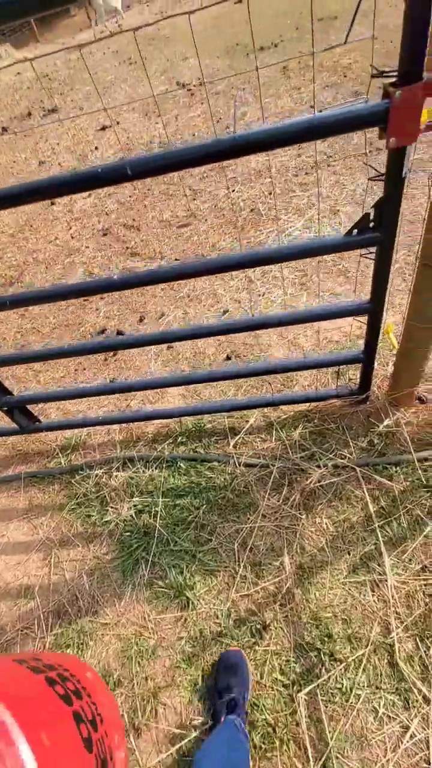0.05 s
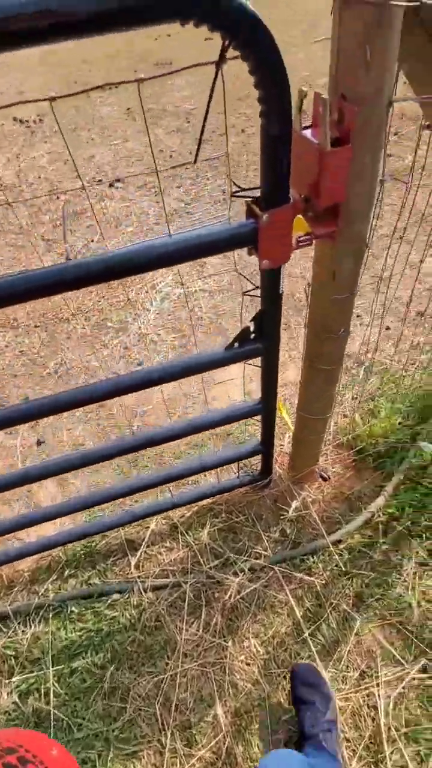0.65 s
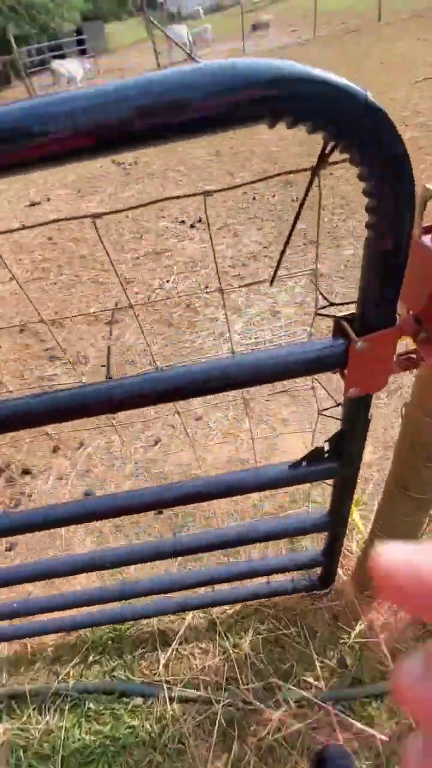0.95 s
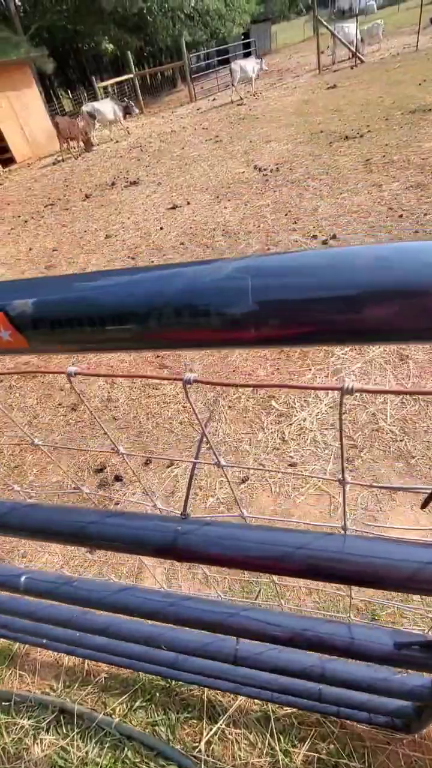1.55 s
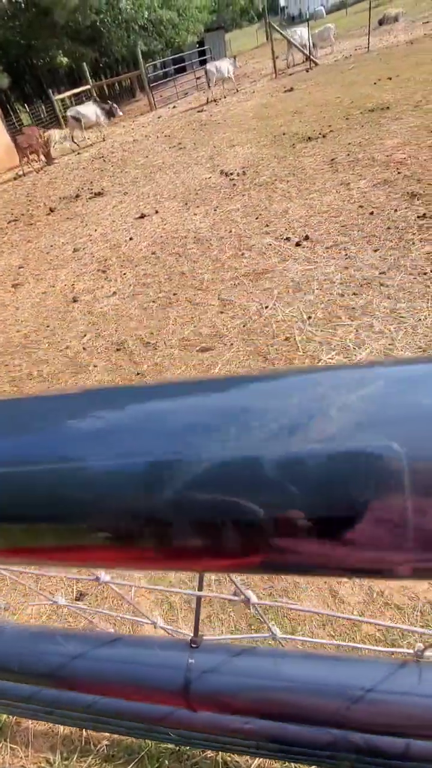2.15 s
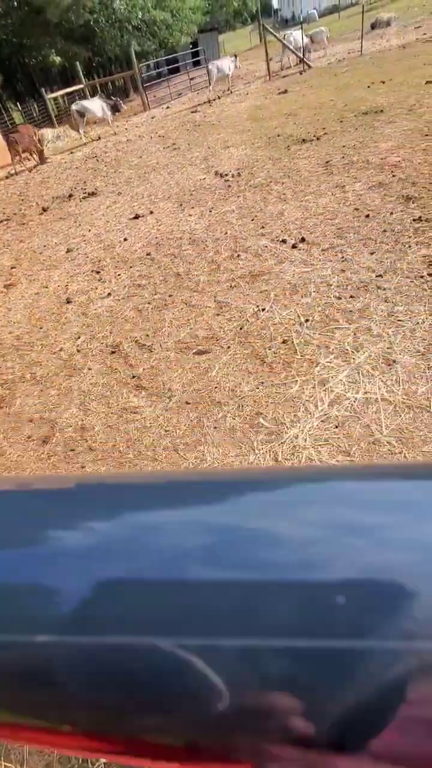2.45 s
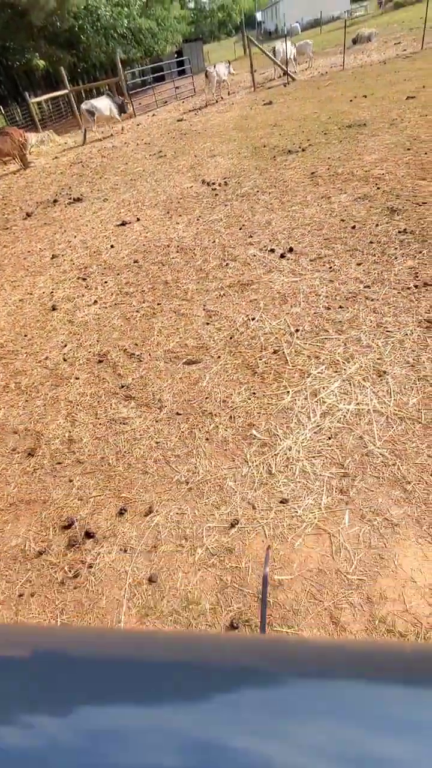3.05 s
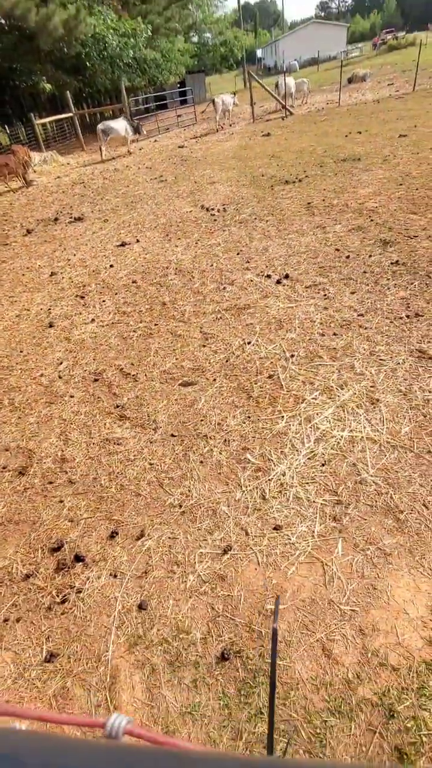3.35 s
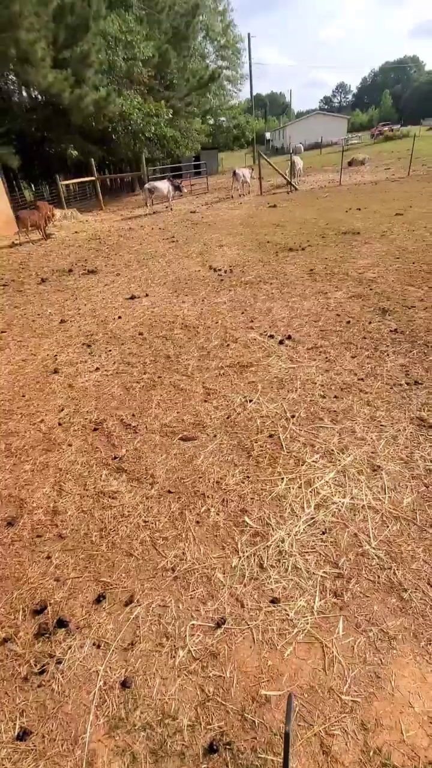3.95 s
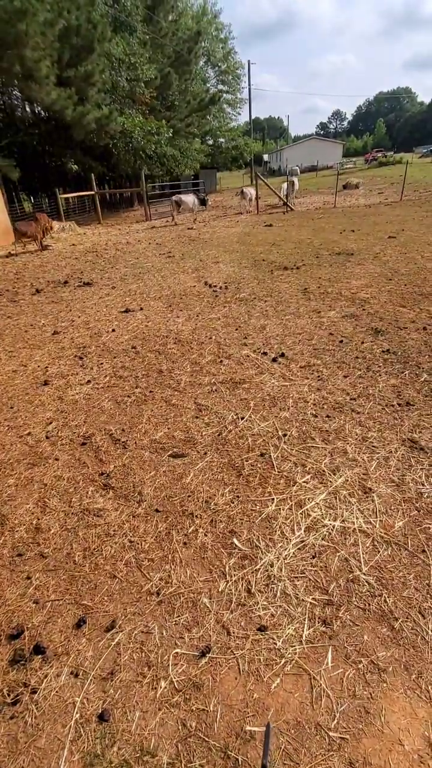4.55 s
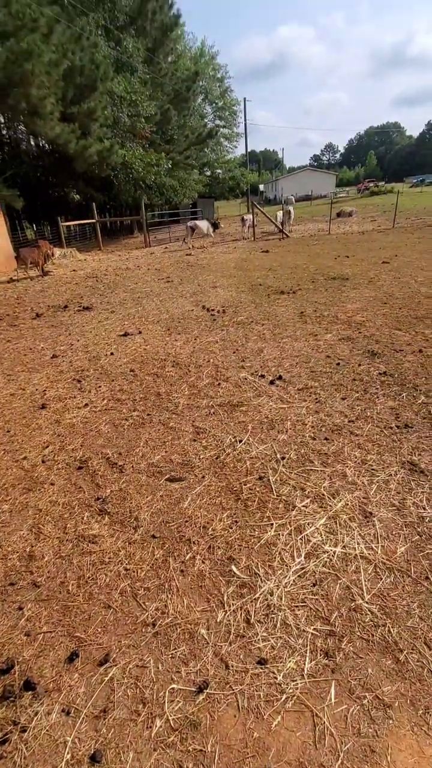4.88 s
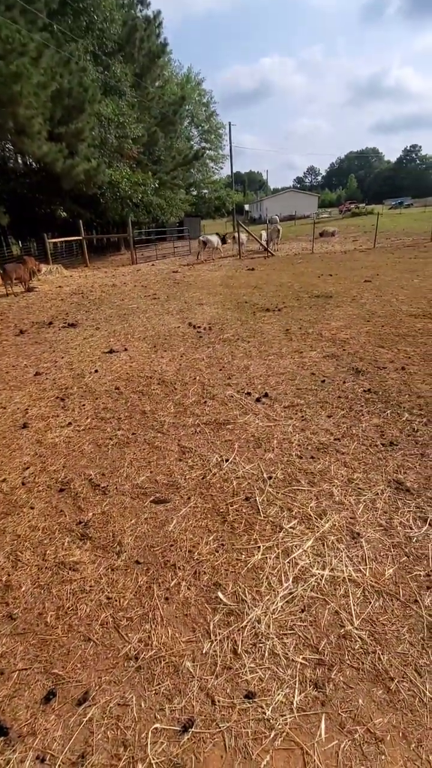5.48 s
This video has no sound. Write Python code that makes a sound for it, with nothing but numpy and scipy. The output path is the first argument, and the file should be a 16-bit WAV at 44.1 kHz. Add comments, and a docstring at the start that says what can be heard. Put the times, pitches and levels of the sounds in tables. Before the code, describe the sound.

For the first second or so, a few steps swish and crackle through dry grass, with dull thuds, soft swells of hiss and a couple of light metal clinks. From about 1.7 seconds a steel chain is handled close by against a tubular farm gate, with a sharp clack at 2.1. The loudest cluster comes around 2.5 to 2.9 seconds: links strike the pipe and ring brightly, setting the gate and its wire mesh shivering. More irregular clacks follow from 3.3 to 4 seconds. Around 4.3 the chain is drawn briefly over the pipe, followed by lighter clinks. A last clatter with soft, dull bumps comes at about 5.3 to 5.5 seconds. Behind it all lie quiet field air and a low wavering hum, with faint thin whistles near 2 and 5 seconds and a distant insect chirping now and then.

```python
"""A steel chain is handled and hooked against a tubular farm gate, close by, outdoors.
First, steps swish through dry grass, with soft, breathy swells of hiss and a few light clinks.
From about two seconds, links clack on the pipe and ring, and hard knocks set the gate and its
wire mesh shivering. After four seconds the chain is drawn over the pipe; a last clatter follows.
Behind it all lie quiet field air and a low hum, with faint whistles and an insect now and then."""
import sys
import numpy as np
from scipy import signal
from scipy.fft import rfft, irfft
from scipy.io import wavfile

SR = 44100
rng = np.random.default_rng(int(sys.argv[2]) if len(sys.argv) > 2 else 0)


def store_wav(level_fs):
    """Save 16-bit WAV to argv[1]."""
    pcm = np.round(np.clip(np.atleast_2d(level_fs), -1, 1) * 32767)
    wavfile.write(sys.argv[1], SR, pcm.T.astype(np.int16))


N = 243431
TIME = np.arange(N) / SR


def from_db(db):
    """Turn decibels into a gain."""
    return 10 ** (np.asarray(db) / 20)


def rms_one(x):
    """Scale a sound to an average power of 1."""
    return x / np.sqrt(np.mean(x ** 2) + 1e-20)


def panned(db):
    """Left and right gains; positive dB leans left."""
    return from_db(np.array([[.5], [-.5]]) * db)


def dying(t, t60):
    """A fade that is 60 dB down after t60 seconds, the fade time."""
    return np.exp(-np.log(1000) * t / max(t60, 1e-3))


def swell(s, length_s, attack_s, t60):
    """Rise, hold, then fade."""
    rise = np.clip((TIME - s) / max(attack_s, 1e-3), 0, 1)
    return rise * dying(np.clip(TIME - s - length_s, 0, 3 * t60), t60)


def in_time(rows):
    """Join (time, value) points into a curve."""
    return np.interp(TIME, *np.transpose(rows))


def at_hz(rows, hz):
    """Read between (frequency, value) points on a log scale."""
    row_hz, values = np.transpose(rows)
    return np.interp(np.log(hz), np.log(row_hz), values)


def add(out, s, sound):
    """Mix a sound in at s seconds."""
    i = max(round(s * SR), 0)
    out[:, i:i + sound.shape[1]] += sound[:, :N - i]


def band(x, low_hz, high_hz, order=2):
    """Keep what lies between two frequencies."""
    return signal.sosfilt(signal.butter(order, [low_hz, high_hz], "band", fs=SR, output="sos"), x)


def resonance(x, hz, width_hz):
    """Ring at one pitch; narrower rings longer."""
    r = np.exp(-np.pi * width_hz / SR)
    feedback = [1, -2 * r * np.cos(2 * np.pi * hz / SR), r * r]
    return signal.lfilter(np.array([1, 0, -1]) * (1 - r * r) / 2, feedback, x)


def noise(spectrum, alike):
    """Coloured stereo noise; alike=1 makes both sides the same."""
    hz = np.maximum(np.fft.rfftfreq(N, 1 / SR), 1)
    mid, side = irfft(rfft(rng.standard_normal((2, N))) * from_db(at_hz(spectrum, hz)), N)
    return rms_one(np.sqrt(1 + alike) * mid + np.sqrt(1 - alike) * side * [[1], [-1]])


def drift(rate):
    """Wander through `rate` random values a second."""
    return np.interp(TIME * rate, np.arange(4096), rng.standard_normal(4096))


def touch(s, db, hz, bite_db, t60, shiver_db):
    """One contact of link and pipe; its very high sparkle grows faster than its treble bite."""
    sparkle_db = max(-12.5 + 2.02 * bite_db, -37)
    return s, db, hz, bite_db, sparkle_db, t60, shiver_db


# Single blows on the pipe. Each row: start in seconds, level in dB, pitch in Hz, bite in dB above
# that level, freedom (0 held by the hand, 1 loose), lead of a lighter touch in seconds.
CLINKS = [(0.656, -35.5, 1086, -25, 0, 0.0023), (1.055, -33, 687, -11.5, 0.7, 0.0071),
          (1.707, -35.5, 1575, -3, 0.26, 0), (1.802, -38.5, 1190, -22, 0.5, 0.00079),
          (1.856, -28, 1544, -12, 0, 0.0026), (1.924, -42.5, 1440, -33, 0.4, 0),
          (1.983, -33, 1540, -12.5, 0.2, 0), (2.0852, -16.5, 1972, -10, 0.34, 0.0076),
          (2.412, -28.5, 1999, -26, 0.32, 0), (2.534, -28, 1974, -31, 0.74, .005),
          (2.5535, -21.5, 2058, -6.5, 0.08, 0.0081), (2.629, -35.5, 1890, -28, 0.6, 0.00066),
          (2.71, -26, 3053, -13, 0.9, 0.0023), (2.752, -29, 2300, -5.5, 0.84, 0.0022),
          (2.7843, -17.5, 1551, 2, 0.82, .008), (2.8544, -16, 2360, 1, 0.74, 0.00035),
          (2.901, -14.5, 1880, -0.5, 0.76, .009), (3.159, -28, 1420, -12, 0.72, 0),
          (3.177, -34.5, 1720, -6, 0.21, 0.00016), (3.3337, -26.5, 2110, -5, 0.62, .0115),
          (3.402, -22, 1990, -4, 0.69, 0.0034), (3.515, -27.5, 1737, -7.5, 0.69, 0.017),
          (3.707, -25, 2455, -4.5, 0.5, 0.0037), (3.7578, -18.5, 1976, -2.5, 0.81, 0.025),
          (3.7668, -20, 1896, -4, 1, 0), (3.975, -16, 2036, -6.5, 0.63, .013),
          (4.017, -27.5, 1969, -5.5, 0.69, 0.001), (4.069, -37.5, 1570, -7.5, 0.2, 0.001),
          (4.217, -45.5, 1812, -20, 0, 0.0024), (4.392, -32, 2660, -5.5, 0.68, 0),
          (4.515, -31.5, 3253, -7, 1, 0.0055), (4.609, -30.5, 2933, -7, 1, 0.0009),
          (5.111, -40.5, 634.4, -14, .3, 0.0012), (5.287, -34.5, 1580, -9, 0.01, 0.00035),
          (5.3495, -18, 2530, -4.5, 0.84, 0.0045), (5.422, -32.5, 3034, -11.5, 0.63, 0.00034),
          (5.488, -29, 3100, -11.5, 0.6, 0)]
DAMPED_T60_S, LOOSE_T60_S = 0.026, 0.081
DAMPED_SHIVER_DB, LOOSE_SHIVER_DB = -49, -3.5   # how much of a blow passes into the gate


def clinks(lead_db=-6.5, bounce_db=-18.5, bounce_s=.036):
    """A looser link clacks longer, shakes the gate more and bounces."""
    touches = []
    chance = rng.uniform(.8, 1.2, (len(CLINKS), 2))
    for (s, db, hz, bite_db, freedom, lead_s), (late, detune) in zip(CLINKS, chance):
        t60 = DAMPED_T60_S * (LOOSE_T60_S / DAMPED_T60_S) ** freedom
        shiver_db = db + DAMPED_SHIVER_DB + freedom * (LOOSE_SHIVER_DB - DAMPED_SHIVER_DB)
        touches.append(touch(s, db, hz, bite_db, t60, shiver_db))
        if lead_s > .003:   # a lighter touch comes first
            touches.append(touch(s - lead_s, db + lead_db, hz * detune,
                                 bite_db - 3, t60, shiver_db + lead_db))
        if freedom > .62:   # a loose link falls back once
            touches.append(touch(s + bounce_s * late, db + bounce_db, hz * detune,
                                 bite_db - 4, t60, shiver_db + bounce_db))
    return touches


# Pulls of the chain over the pipe. Each row: start and length in seconds, level in dB,
# pitch in Hz, bite in dB above that level, gate shiver in dB.
DRAGS = [(2.388, .065, -34.5, 1774, -14, -46.5), (2.457, .04, -32, 1911, -25, -45.5),
         (3.019, .04, -42, 1706, -6, -44.5), (3.441, .04, -41, 1937, -6.5, -46),
         (4.258, .2, -35, 1657, -8.5, -35), (4.775, .04, -37, 2360, -7, -42.5)]
LINK_GAP_S, DRAG_T60_S = .023, 0.088


def drags(jitter_s=.003, spread_db=2.5, spread_octaves=0.228):
    """Links trip over the pipe at a nearly even pace, each with its own strength and pitch."""
    touches = []
    for s, length_s, db, hz, bite_db, shiver_db in DRAGS:
        count = int(np.ceil(length_s / LINK_GAP_S))
        for k, (late, size, detune) in enumerate(rng.standard_normal((16, 3))[:count]):
            start = s + k * LINK_GAP_S + jitter_s * late
            pitch = hz * 2 ** (spread_octaves * detune)
            extra_db = spread_db * size
            touches.append(touch(start, db + extra_db, pitch, bite_db, DRAG_T60_S, shiver_db + extra_db))
    return touches


# The lightest contacts. Each row: start in seconds, level in dB, pitch in Hz, bite in dB above it.
TICKS = [(0.509, -44, 1260, -0.5), (.991, -53.5, 1970, 2), (1.018, -59, 2020, -2), (1.489, -56.5, 2100, 5),
         (1.758, -44.5, 1560, 5.5), (3.926, -39, 1569, -1.5), (5.009, -52, 1376, 8.5)]


def ticks(t60=0.01):
    """A link's tip just grazes the pipe with a tiny, dry tick."""
    return [touch(s, db, hz, bite_db, t60, db + DAMPED_SHIVER_DB) for s, db, hz, bite_db in TICKS]


# Short resonances of the pipe. Each row: pitch in Hz, width in Hz, boost in dB.
PIPE_MODES = [(604, 18, 8), (788, 17, 5.5), (1170, 420, 9.5), (1546, 31, 9), (1930, 120, 1.5),
              (2121.7, 96, 9.5), (2437, 59.7, 6), (2673, 186, 11.5), (3090, 60, 13), (4081, 23, 7.5),
              (3550, 61, 5.5), (4135, 130, 9), (4716, 44, 9.5), (5164, 20, 6), (5850, 110, 9.5),
              (7040, 39, 11), (7520, 150, 5.5), (8210, 130, 5.5)]


def clacks(touches, contact_s=0.003, grain_db=1.5, ping_db=-5, alike=0.49, lag_s=0.000394):
    """At each touch a link chatters on the pipe, which colours the burst; the hand soon damps it."""
    out, t = np.zeros((2, N)), np.arange(SR // 6) / SR
    for s, db, hz, bite_db, sparkle_db, t60, _ in touches:
        left, other, chance = rng.standard_normal((3, len(t)))
        grain = chance[np.arange(len(t)) // 30]   # a new value every 30 samples
        # part of the burst reaches both sides, the right a little later
        right = alike * np.interp(t - lag_s, t, left) + np.sqrt(1 - alike ** 2) * other
        envelope = (1 - np.exp(-t / 0.00022)) * dying(np.maximum(t - contact_s, 0), t60)
        burst = np.array([left, right]) * from_db(grain_db * grain) * envelope
        for mode_hz, width_hz, lift_db in PIPE_MODES:
            burst = burst + (from_db(lift_db) - 1) * resonance(burst, mode_hz, width_hz)
        body = band(burst + 1.9 * resonance(burst, hz, width_hz=220), 1155, 2310)
        # the pipe wall answers with one brief, clean ping
        ping = np.sin(2 * np.pi * hz * t + grain[:2, None])
        ping *= (1 - np.exp(-t / 0.00044)) * dying(t, t60=0.03)
        body = rms_one(body) + from_db(ping_db) * rms_one(ping)
        # softer contacts lose the top of their bite
        bite = band(burst, 3290, np.interp(sparkle_db, [-42, -15], [6000, 8600]), order=5)
        sparkle = band(burst, 9300, 14150, order=3)
        thud = band(burst, 482, 893)
        thud_db = -13 + 4 * np.log2(t60 / DRAG_T60_S)   # longer clacks carry more thud
        parts = (thud, thud_db, -2), (body, 0, -1), (bite, bite_db, 0), (sparkle, sparkle_db, -6)
        for part, part_db, pan_db in parts:
            attack = np.sqrt(np.mean(part[:, :SR // 125] ** 2, axis=1, keepdims=True))   # first 8 ms
            add(out, s, part / attack * from_db(db + part_db) * panned(pan_db))
    return out


# A link's own tones. Each row: pitch in Hz, relative level in dB, fade time in seconds.
LINK_TONES = [(1547, -6, .3), (3042, -8, .6), (4199, 2, .13), (4640, -4, .2), (5160, -16, .12),
              (5390, -7, .14), (5560, -16, .3), (5796, -5, .26), (6883, 3, .11), (7150, -6, .12),
              (7430, -6, .12), (7715, -5, .08), (8358, 5, .075), (10270, -16, .12), (11050, -12, .14),
              (12660, -15, .1), (13991, -16, .17)]
# Links hanging free after a blow. Each row: start in seconds, favoured pitch in Hz,
# its level in dB, dB added to the other tones.
RINGS = [(1.926, 1547, -46, -81), (1.982, 1547, -41, -79), (2.086, 7150, -48, -67), (2.438, 1547, -35, -71),
         (2.553, 7150, -39, -54), (2.716, 5796, -28, -63), (2.785, 3042, -20, -17), (2.857, 5796, -19, -19),
         (2.9, 5560, -30, -44), (3.332, 7150, -35, -74), (3.404, 4199, -55, -52), (3.708, 7150, -21.5, -53),
         (3.771, 4640, -23.5, -45), (3.975, 5160, -26, -38), (4.068, 1547, -40, -76)]


def ringing_links(free_s=0.071, choke_t60=0.033, rise_s=0.00087):
    """A free link rings in all its tones; the contact point favours one of them."""
    out, t = np.zeros((2, N)), np.arange(SR // 4) / SR
    hz, tone_db, t60 = np.transpose(LINK_TONES)
    fades = [dying(t, life) for life in t60]
    tones = np.exp(2j * np.pi * hz[:, None] * t) * fades * (1 - np.exp(-t / rise_s))
    for s, favoured_hz, db, others_db in RINGS:
        levels = others_db + tone_db
        levels[np.argmin(np.abs(hz - favoured_hz))] = db
        # left and right are up to half a cycle apart
        cycle, apart = rng.random((2, len(hz)))
        phases = 2 * np.pi * cycle + np.pi * (apart - .5) * [[1], [-1]]
        ring = ((from_db(levels) * np.exp(1j * phases)) @ tones).real
        # the hand chokes the ring, unless a later clink does so first
        choked_s = min([s + free_s] + [later for later, *_ in CLINKS if later > s + LINK_GAP_S])
        add(out, s, ring * dying(np.maximum(s + t - choked_s, 0), choke_t60))
    return out


# The shiver of pipes and mesh. Each row: frequency in Hz, relative level in dB.
SHIVER_COLOUR = [(250, -11), (450, -12), (700, -9), (950, -8), (1350, -0.5), (1900, 1.5), (2600, 0.5),
                 (3400, 0.5), (4300, -7), (6000, -23), (8000, -16), (9200, -34)]
# How long it lasts. Each row: frequency in Hz, fade time in seconds.
SHIVER_FADE = [(300, 0.55), (1800, 0.36), (4000, 0.29), (8000, 0.32)]
# Long tones of the frame. Each row: pitch in Hz, relative level in dB, fade time in seconds.
FRAME_TONES = [(1338, -26, 5.0), (1362, -26, 4.5), (1530, -18, .9), (1626, -19, .9), (1775, -24, 2.2),
               (1852, -9, .3), (1950, -15, .9), (2225, -11, .42), (2579, -20, 1.0), (2799, -18, .7),
               (3138, -20, .6), (3795, -12, 1.1), (3860, -21, .8)]


def gate(touches, frame_db=-3, uneven_db=3, count=420):
    """Knocks spread through pipes and mesh: hundreds of crowded tones and a few long ones."""
    t = np.arange(3 * SR) / SR
    early = t[:SR // 2]
    mesh = np.zeros((2, len(t)))
    pitches = 250 + 9000 * (np.arange(count) + rng.random(count)) / count
    for hz, phase, size in zip(pitches, rng.random((count, 2, 1)), rng.standard_normal((count, 2, 1))):
        gain = from_db(at_hz(SHIVER_COLOUR, hz) + uneven_db * size)
        tone = np.sin(2 * np.pi * (hz * early + phase))
        mesh[:, :len(early)] += gain * tone * dying(early, at_hz(SHIVER_FADE, hz))
    response = mesh / np.sqrt(np.mean(mesh[:, :SR // 50] ** 2))
    for hz, db, t60 in FRAME_TONES:
        tone = np.sin(2 * np.pi * (hz * t + rng.random((2, 1))))
        response += from_db(db + frame_db) * tone * dying(t, t60)
    knocks = np.zeros((1, N))
    for s, *_, shiver_db in touches:
        add(knocks, s, from_db([[shiver_db]]))
    return signal.fftconvolve(knocks, response * (1 - np.exp(-t / 0.00075)))[:, :N]


# Soft bumps. Each row: start in seconds, peak in dB before panning, pitch in Hz, fade time in seconds.
BUMPS = [(0.338, -40, 136, 0.083), (0.658, -31, 84, 0.026), (0.715, -26, 320, 0.042), (.96, -36, 300, 0.14),
         (2.924, -31, 303.9, 0.32), (4.189, -42.5, 49.5, 0.16), (4.685, -36.5, 204, 0.21),
         (5.291, -33.5, 200, 0.15), (5.351, -34.5, 189.8, 0.14), (5.386, -34.5, 326.3, 0.7),
         (5.456, -35.5, 194, 0.16)]


def bumps(width=0.54, pan_db=-6):
    """Feet and hands make dull, damped thuds on the right."""
    out, t = np.zeros((2, N)), np.arange(SR // 3) / SR
    for s, db, hz, t60 in BUMPS:
        mid, side = rng.standard_normal((2, len(t)))
        push = (mid + 0.9 * side * [[1], [-1]]) * dying(t, t60)
        thud = resonance(resonance(push, hz, width * hz), hz, width * hz)
        add(out, s, thud / np.abs(thud).max() * from_db(db))
    return out * panned(pan_db)


# Steps in dry grass. Each row: start and length in seconds, swish in dB, relative crackle in dB.
STRIDES = [(0.193, 0.084, -53.5, -53), (0.496, 0.034, -60, -55.5), (0.599, 0.068, -41.5, -41),
           (0.706, .22, -37, -41), (0.885, 0.16, -40, -63)]
# The sound of the stalks and of their tips. Each row: frequency in Hz, relative level in dB.
SWISH_COLOUR = [(150, -73), (250, -5.5), (404, -11), (469, -4), (615, -1.5), (1860, -4.5), (3660, -8),
                (4130, -4.5), (9000, -28.5), (11700, -53), (19800, -120)]
CRACKLE_COLOUR = [(4000, -13), (7000, 6), (9000, -4.5), (12000, -4), (16000, -6.5)]


def grass(crackle_db=-5):
    """Dry stalks brush past a shoe and settle: a grainy swish with fine crackle on top."""
    strides = [from_db([[swish], [crackle]]) * swell(s, length_s, attack_s=0.029, t60=0.62)
               for s, length_s, swish, crackle in STRIDES]
    swish, crackle = np.max(strides, axis=0)
    stalks = noise(SWISH_COLOUR, alike=0.013) * swish * from_db(2.6 * drift(250))
    tips = noise(CRACKLE_COLOUR, alike=0.046) * crackle * from_db(crackle_db + 2 * drift(900))
    return stalks + tips


# Swells of hiss. Each row: start and length in seconds, level in dB.
HISS_SWELLS = [(0, 0.063, -48), (0.786, 0.29, -42), (0.989, 0.092, -38.5), (1.161, 0.05, -44.5),
               (1.305, .08, -52)]
# Their hollow resonances. Each row: pitch in Hz, width in Hz, relative level in dB.
HISS_MODES = [(670, 170, -7.5), (1800, 72, -1.5), (2510, 55, 4), (2820, 310, -1), (4220, 350, -5.5)]


def breathy_hiss(grain_db=2.0, hiss_db=-13):
    """Soft, breathy swells of hiss with a few hollow resonances."""
    grainy = rng.standard_normal((2, N)) * from_db(grain_db * drift(200))
    hollow = sum(from_db(db) * (-1) ** k * resonance(grainy, hz, width_hz)
                 for k, (hz, width_hz, db) in enumerate(HISS_MODES))
    hiss = from_db(hiss_db) * rms_one(band(grainy, 4500, 9000, order=1))
    swells = [from_db(db) * swell(s, length_s, attack_s=0.014, t60=0.36)
              for s, length_s, db in HISS_SWELLS]
    return (rms_one(hollow) + hiss) * np.max(swells, axis=0)


# Whistles. Each row: start and length in seconds, pitch in Hz, glide in Hz a second, level in dB.
WHISTLES = [(2.012, .07, 2460, -450, -50), (2.158, 0.31, 1800, 500, -53), (2.209, 0.095, 2428, 598, -49),
            (4.8, 0.047, 2642, 25, -51), (4.996, 0.1, 2450, 7, -53.5), (5.135, 0.048, 2640, -200, -46.5)]


def whistles(waver_hz=29):
    """Faint, thin, slightly wavering whistles glide and fade."""
    out, waver = np.zeros(N), waver_hz * drift(170)
    for s, length_s, hz, glide, db in WHISTLES:
        pitch = hz + glide * np.clip(TIME - s, 0, length_s) + waver
        envelope = from_db(db) * swell(s, length_s, attack_s=0.0083, t60=0.24)
        out += envelope * np.sin(2 * np.pi * np.cumsum(pitch) / SR)
    return out


# The sound of the air. Each row: frequency in Hz, relative level in dB.
AIR_COLOUR = [(15, -12), (25, -17), (76, 2.5), (185, -11), (285, -8), (476, -11.5), (607, -7.5), (863, -14),
              (1740, -11.5), (3520, -18), (5880, -19.5), (8590, -29), (16000, -37)]
# Its rise and fall. Each row: time in seconds, level in dB.
AIR_LEVEL = [(0, -51.5), (1.6, -52.5), (2.0, -53), (2.25, -48), (2.7, -49.5), (3.27, -52.5), (4.15, -54.5),
             (5.52, -50.5)]


def air(waver_db=1.2):
    """Open air makes a soft, slowly wavering rush."""
    return noise(AIR_COLOUR, alike=0.11) * from_db(in_time(AIR_LEVEL) + waver_db * drift(2.5))


# The hum's rise and fall. Each row: time in seconds, level in dB.
HUM_LEVEL = [(0, -61), (1.5, -71), (2.1, -57.5), (2.9, -58), (3.6, -60), (5.52, -68.5)]


def hum(hz=60.5, waver_hz=4, waver_db=6):
    """One low tone wavers in pitch and loudness."""
    pitch = hz + waver_hz * drift(7.6)
    tone = np.sqrt(2) * np.sin(2 * np.pi * np.cumsum(pitch) / SR)
    return tone * from_db(in_time(HUM_LEVEL) + waver_db * drift(15))


# Spells of chirping. Each row: start and end in seconds.
CHIRP_BOUTS = [(.25, .5), (1.27, 1.55), (1.75, 2.6), (4.25, 4.9), (4.94, 5.2)]


def insect(db=-69, hz=9650, every_s=.203, half_length_s=.021):
    """A far insect chirps in even pulses of thin, high buzz."""
    chirps = sum(np.exp(-((TIME - s) / half_length_s) ** 4)
                 for bout in CHIRP_BOUTS for s in np.arange(*bout, every_s))
    buzz = rms_one(band(rng.standard_normal((2, N)), hz - 200, hz + 200))
    return from_db(db) * chirps * buzz


# Where the hand holds the chain. Each row: time in seconds, left minus right in dB.
HAND_PATH = [(.5, 9.5), (1.7, 2.5), (1.98, -7.5), (2.08, 4), (2.5, -1.5), (2.8, -1), (3.4, 1), (3.9, 0),
             (4.6, -2.5), (5.4, 0.5)]


def scene(gate_pan_db=-3):
    """The chain moves with the hand; the gate stands slightly to the right."""
    around = air() + hum() + insect() + whistles() + grass() + breathy_hiss() + bumps()
    ringing = ringing_links()
    touches = ticks() + clinks() + drags()
    shaking = gate(touches) * panned(gate_pan_db)
    chain = (clacks(touches) + ringing) * panned(in_time(HAND_PATH))
    return chain + shaking + around


def record(dry, stop_hz=17000):
    """Round off the tallest peaks and cut the highest treble."""
    return signal.sosfilt(signal.cheby2(14, 70, stop_hz, fs=SR, output="sos"), np.tanh(dry))


dry = scene()
out = record(dry)
store_wav(out)
```